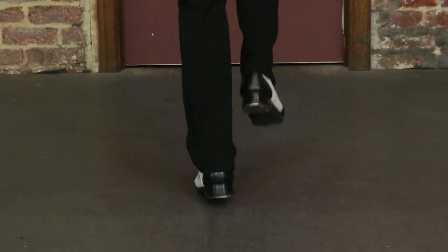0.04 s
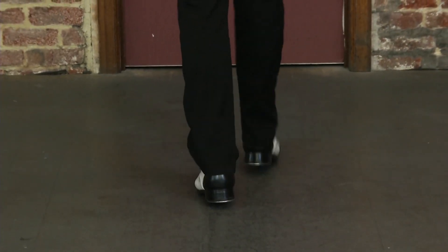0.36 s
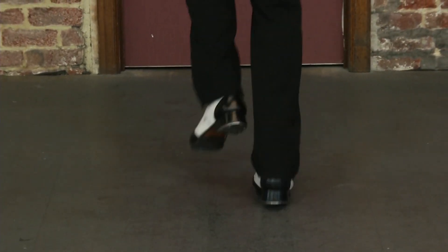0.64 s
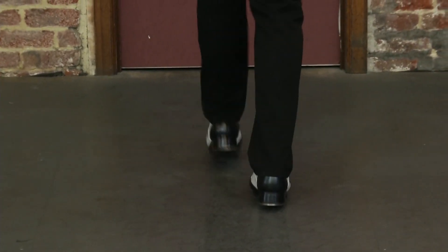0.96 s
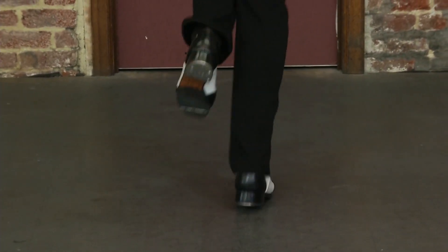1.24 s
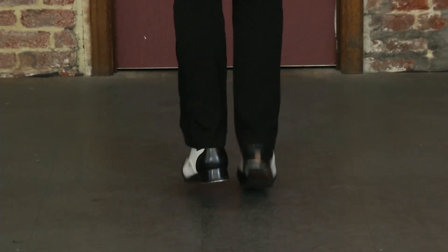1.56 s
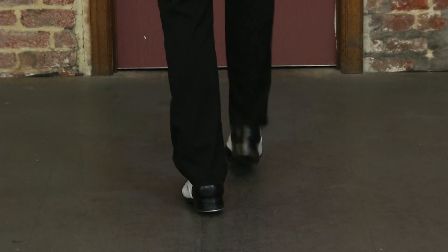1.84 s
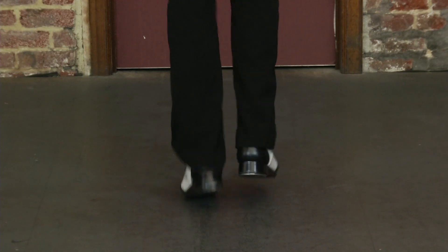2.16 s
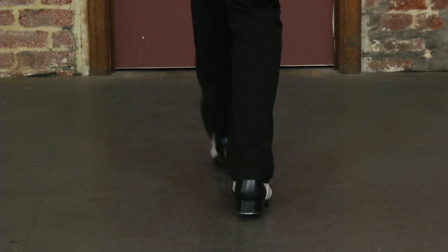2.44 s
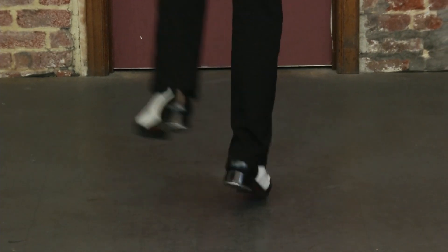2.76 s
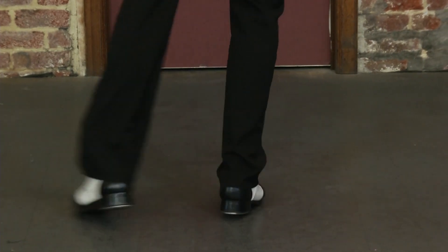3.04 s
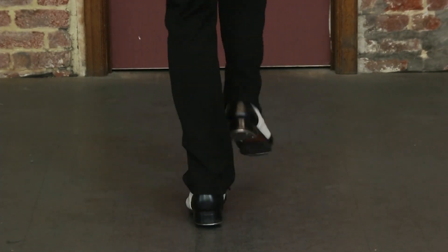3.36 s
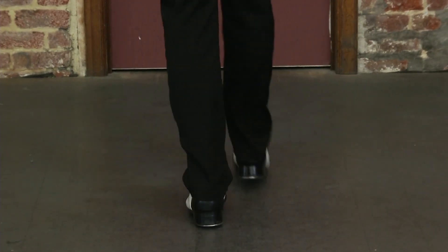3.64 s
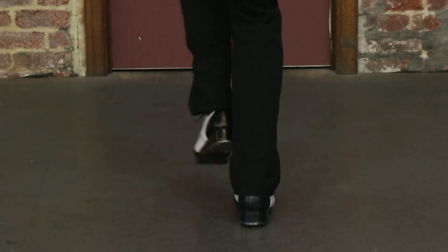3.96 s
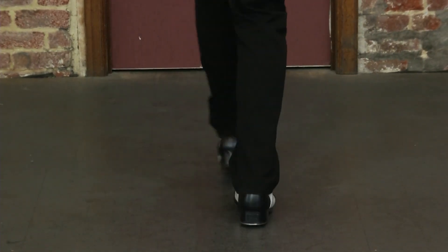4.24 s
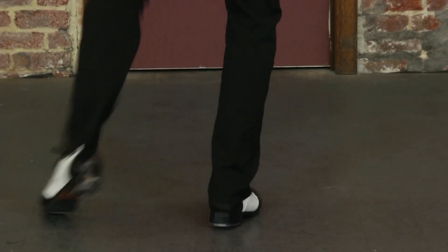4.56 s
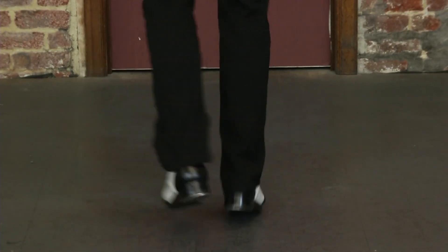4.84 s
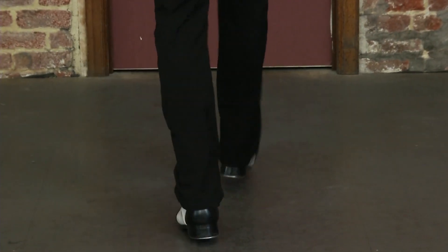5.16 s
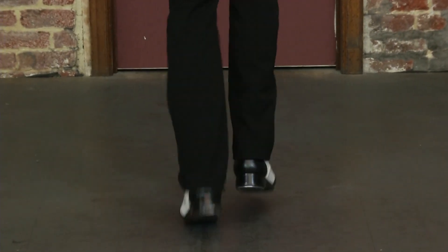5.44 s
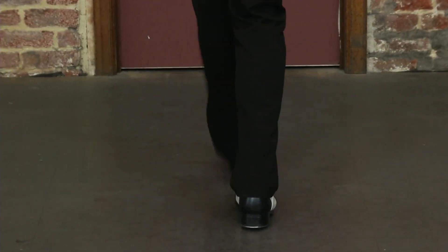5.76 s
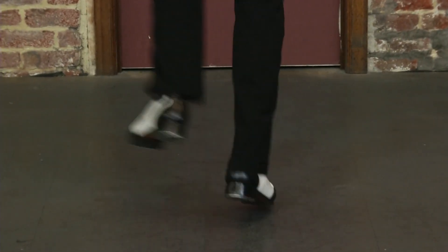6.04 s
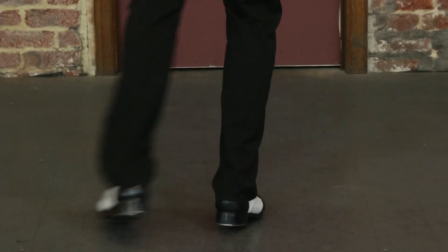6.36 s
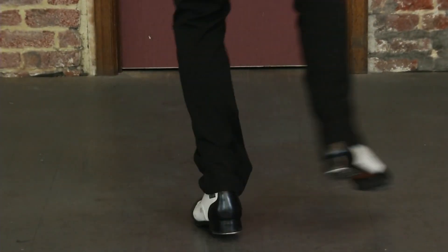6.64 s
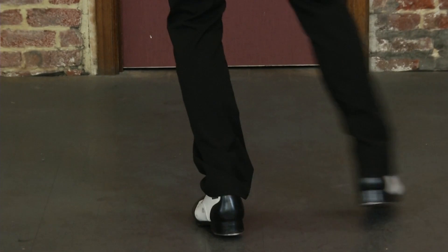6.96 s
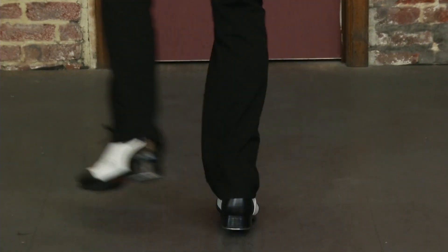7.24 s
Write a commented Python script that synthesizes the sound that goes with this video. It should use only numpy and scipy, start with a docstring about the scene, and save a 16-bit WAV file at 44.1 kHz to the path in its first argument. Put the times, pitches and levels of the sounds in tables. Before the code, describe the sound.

Sharp metallic tap shoe clicks on a hard floor, about five a second, ringing out in a reverberant room.

```python
"""Sharp tap-shoe clicks on a hard floor, about five steps a second, ring out in a brick-walled room.
Each blow shakes the shoe's body, its sole and its metal plate for a few milliseconds.
The room answers with quick echoes and a long fading tail. A faint steady hiss lies underneath.
A limiter turns the volume down on each loud blow, so the tail swells back after it."""
import sys
import numpy as np
from scipy import signal
from scipy.io import wavfile
from scipy.ndimage import uniform_filter1d, minimum_filter1d

SR = 44100
rng = np.random.default_rng(int(sys.argv[2]) if len(sys.argv) > 2 else 0)


def unload_audio(sound):
    """Save the sound as a 16-bit wav file, at the path given as the first command line argument."""
    columns = np.transpose(np.atleast_2d(sound))
    # keep every value between -1 and 1, then stretch to whole-number steps
    steps = np.round(np.clip(columns, -1, 1) * 32767)
    wavfile.write(sys.argv[1], SR, steps.astype(np.int16))


N = 325899
CUTOFF_HZ = 16400   # treble above this is cut away


def from_db(db):
    """Turn decibels into a number to multiply a sound by."""
    return 10 ** (np.asarray(db) / 20)


def at_hz(points, hz, column=1):
    """Look up a table's value at any pitch, sliding between its rows."""
    table = np.array(points)
    return np.interp(np.log(hz), np.log(table[:, 0]), table[:, column])


def noise_bands():
    """Split noise into slices half an octave wide: (middle pitch [Hz], noise) for each."""
    edges = 25 * 2 ** (np.arange(20) / 2)
    white = rng.standard_normal((2, N))
    bands = []
    for k, (low, high) in enumerate(zip(edges, edges[1:])):
        band_filter = signal.butter(2, [low, high], "band", fs=SR, output="sos")
        bands.append((np.sqrt(low * high), signal.sosfilt(band_filter, white[k % 2])))
    return bands


def add(out, sound, start):
    """Mix a sound in from a start sample on."""
    skip = max(0, -start)
    piece = sound[skip:len(out) - start]
    out[start + skip:start + skip + len(piece)] += piece


def strike(ms, tones, tuning, stretch=1, head_start=1.375):
    """A part's tones build as the shoe rolls down, and swing together at 0 ms, when it slaps flat."""
    out = 0
    for hz, decay_ms, level_db in tones:
        detune, change_db, phase = rng.normal(0, [.008, .5, .12])
        age = np.maximum(ms / (decay_ms * stretch) + head_start, 0)   # counted in fade times
        rise_and_fall = age * np.exp(1 - age)
        swing = -np.cos(2 * np.pi * hz * tuning * (1 + detune) * ms / 1000 + phase)
        out = out + from_db(level_db + change_db) * rise_and_fall * swing / stretch
    return out


def skid(ms, level_db=-26, decay_ms=1.0, low_hz=6000):
    """Metal skids on the floor as it lands, making a tiny burst of hiss."""
    keep_treble = signal.butter(2, low_hz, "high", fs=SR, output="sos")
    hiss = signal.sosfilt(keep_treble, rng.standard_normal(len(ms)))
    return from_db(level_db) * hiss * (ms > 0) * np.exp(-np.abs(ms) / decay_ms)


# The tones of the floor, the shoe's parts and the crack where they meet, before a step adjusts them:
# (pitch [Hz], fade time [ms], level [dB])
FLOOR_BOOM = [(376, 2.1, -31.5)]
BODY_THUD = [(280.6, 1.19, -23.5), (539, 0.71, -16.5)]
HEEL_CLOP = [(969, 0.67, -15.5)]
SOLE_KNOCK = [(1424, 0.74, -8), (1855, 0.97, -13.5)]
METAL_RING = [(2211, 0.74, -8), (2730, 0.43, -8.5)]
METAL_CLINK = [(3956, 0.28, -3)]
METAL_PING = [(5450, 0.18, -11.5)]
METAL_TING = [(8130, 0.55, -21.5), (12300, 0.48, -30.5)]
CONTACT_CRACK = [(7230, 0.082, -8), (10700, 0.037, -5)]
# How each kind of stroke turns those sounds up or down and retunes them:
# (boom [dB], thud [dB], clop [dB], knock [dB], ring [dB], clink [dB], ping [dB], crack [dB],
# ring tuning [ratio], clink tuning [ratio])
STROKE_MIX = { "heel": (-25, 3, 9.3, 2.5, -2.7, -2, 2.5, 0.5, 1.08, 1.16),
              "ball": (-9, 3.7, -8, -1, -0.8, -2.5, -12, 1, 1.12, 1.05),
              "stamp": (2, 7.8, -12, 2.2, 1.4, -2.5, 0, 1, 1.06, .95),
              "click": (-23, 2, 6, -4.5, 1, 6.5, 3, 2, 1.06, .99),
              "toe": (-34, 1.6, 6.5, -8, 1.5, 0.1, -0.5, 1.3, 1.0, 1.0),
              "tip": (-35, 3, 0.5, -4.5, 1.6, -0.6, 2.5, 1.5, 1.04, 1.08),
              "dig": (-32, 2.5, -3.5, 1.85, -0.7, .5, -2, 1.3, 1.11, 1.066),
              "slap": (-29, 7.5, -1.5, 1.7, 1.3, 3, -11, 5, 1.16, 1.05),
              "flat": (-15, 4.5, -5, 0.5, 1.3, 2, 4.5, .5, 1.05, 0.9)}


def shoe_tap(ms, stroke, brightness, ting_tuning, pivot_hz=2300, touch_ms=1.87, touch_db=-15):
    """One blow shares its force among the shoe's parts; a sharper landing favours the high ones."""
    boom, thud, clop, knock, ring, clink, ping, crack, ring_tuning, clink_tuning = STROKE_MIX[stroke]
    # the spot that lands picks a high tone of the plate; the higher it is, the weaker it is
    ting = crack - 2.7 * 20 * np.log10(ting_tuning)
    # a stroke with a strong clink leaves the plate free, so the clink rings longer
    clink_stretch = from_db(0.61 * max(clink, 0))
    parts = [(FLOOR_BOOM, boom, 1, 1), (BODY_THUD, thud, 1, 1), (HEEL_CLOP, clop, 1, 1),
             (SOLE_KNOCK, knock, 1, 1), (METAL_RING, ring, ring_tuning, 1),
             (METAL_CLINK, clink, clink_tuning, clink_stretch), (METAL_PING, ping, 1, 1),
             (METAL_TING, ting, ting_tuning, 1), (CONTACT_CRACK, crack, 1, 1)]
    blow = from_db(crack) * skid(ms)
    for tones, level_db, tuning, stretch in parts:
        tilt_db = brightness * np.log2(tones[0][0] / pivot_hz)
        blow += from_db(level_db + tilt_db) * strike(ms, tones, tuning, stretch)
    # the plate's edge touches lightly just before the slap
    early_ms = touch_ms * rng.uniform(0.668, 1.328)
    return blow + from_db(ring + touch_db) * strike(ms + early_ms, METAL_RING, ring_tuning)


# The room's wash of blended echoes:
# (pitch [Hz], relative level [dB], time for the tail to fade 60 dB [s])
ROOM_WASH = [(85, -18, 0.84), (123, -3.5, 1.5), (160, -1, 1.4), (260, 8, 0.49), (580, 0.84, 0.71),
             (900, -9, 1.02), (1410, -6.5, 0.89), (1920, -0.13, 0.91), (2700, -.5, .85), (4200, 0.8, 0.54),
             (7750, -4.5, 0.59), (13300, -9.5, 0.38)]
# Single echoes off the walls and ceiling: (delay [s], level [dB], treble cut-off [Hz])
WALL_ECHOES = [(.0059, -15, 4170), (.0081, -16, 6300), (0.013, -15, 5000), (0.022, -20.5, 3500),
               (0.083, -29, 4500), (.098, -25, 3500)]


def room_answers(count, early_db=-28, early_fade_s=0.12, late_db=-37, gap_s=0.00705):
    """Give the room's answer to each step: the feet move, so the sound bounces differently each time."""
    length = int(1.1 * SR)
    t = np.arange(length) / SR
    arrived = np.clip((t - gap_s) / 0.0005, 0, 1)
    early = from_db(early_db - 60 * t / early_fade_s)
    bands = []
    for hz, noise in noise_bands():
        late = from_db(late_db - 60 * t / at_hz(ROOM_WASH, hz, column=2))
        bands.append((noise, arrived * from_db(at_hz(ROOM_WASH, hz)) * np.hypot(early, late)))
    click = t[:SR // 128] == 0
    dull_clicks = [signal.sosfilt(signal.butter(2, hz, fs=SR, output="sos"), click)
                   for _, _, hz in WALL_ECHOES]
    for _ in range(count):
        start = rng.integers(N - length)
        answer = sum(noise[start:start + length] * fade for noise, fade in bands)
        for (delay_s, level_db, _), echo in zip(WALL_ECHOES, dull_clicks):
            shift_s, change_db = rng.normal(0, [.0005, 2])
            add(answer, from_db(level_db + change_db) * echo, int((delay_s + shift_s) * SR))
        yield answer


# The dance, one row for each blow: (time [s], stroke [name], strength [dB], brightness [dB per octave],
# room share [dB], ting tuning [ratio])
DANCE_STEPS = [ (.0048, "heel", 1.5, -0.4, -2.5, 1.05), (.223, "ball", 0.5, 0, -0.6, 0.89),
               (0.4194, "stamp", 0.5, .4, 2, .73), (0.6213, "click", 2, 0.16, -2, 0.89),
               (.8126, "tip", -1, 0.16, -1.7, 1.02), (1.0262, "dig", 0, 0.4, -2, 1),
               (1.2392, "dig", 0, 0.4, -3.5, 0.98), (1.4504, "toe", 2, 0, -0.5, 0.9),
               (1.6497, "heel", 1, 0, 0.2, 1.16), (1.8685, "ball", -0.3, -0.2, -1.9, .94),
               (2.073, "stamp", -.5, .5, 2, 1.1), (2.2689, "click", -1.5, 0, -2.5, 0.84),
               (2.476, "tip", -.5, 0.1, -1.5, 1.1), (2.6871, "dig", -3, -0.15, -5, 1.25),
               (2.8913, "dig", 3.5, 0.3, -3.5, 0.78), (2.9683, "slap", -0.5, 0.26, -2.5, 0.98),
               (3.094, "flat", -1.5, 0.3, -1, 0.69), (3.3026, "toe", .5, 0.24, -1.5, 1.03),
               (3.509, "ball", -0.2, -.2, -2.5, .95), (3.7047, "stamp", -1, -0.2, 2, 1.02),
               (3.9134, "click", 2.5, -.1, -1.6, 0.97), (4.0876, "tip", 0.8, .3, -2.5, 1.08),
               (4.302, "tip", -1.2, -0.2, -2, 0.71), (4.5154, "dig", 1, .2, -4, 1.2),
               (4.6077, "slap", 2, 0.3, -1, 1), (4.7222, "flat", -0.5, 0, .5, 0.79),
               (4.936, "toe", 0.5, 0, -2.5, 0.98), (5.1346, "ball", 0, 0, -2.5, 0.92),
               (5.346, "stamp", 1.4, .1, 1.2, 1.03), (5.5393, "click", 1, 0.16, -3.5, 0.87),
               (5.7407, "toe", 0.2, .3, -1.5, .99), (5.95, "tip", -1, 0.2, -.9, 0.787),
               (6.1544, "dig", 0, 0.7, -3, 1.02), (6.226, "slap", 1, -.1, -1, 1.03),
               (6.3512, "flat", 1.5, -.5, -1.5, 1.16), (6.568, "toe", 0, 0.4, -1.6, 1),
               (6.7735, "dig", -1, -.6, -5.5, 1), (6.9783, "heel", 0, 0.34, -2, 0.78),
               (7.1846, "toe", -1, .3, -2.5, 0.82), (7.3869, "dig", 3, -0.2, -10, 0.76)]


def tap_dance(boost_db=3):
    """Each blow is heard straight from the shoe, then again as it bounces around the room."""
    before = SR // 200   # samples of build-up ahead of the slap
    ms = np.arange(-before, 3 * before) * 1000 / SR
    out = np.zeros(N)
    for step, answer in zip(DANCE_STEPS, room_answers(len(DANCE_STEPS))):
        time_s, stroke, strength_db, brightness, room_db, ting_tuning = step
        blow = from_db(boost_db + strength_db) * shoe_tap(ms, stroke, brightness, ting_tuning)
        start = round(time_s * SR) - before
        add(out, blow, start)
        add(out, from_db(room_db) * signal.fftconvolve(blow, answer), start)
    return out


# The steady noise under the taps: (pitch [Hz], relative level [dB per Hz])
HISS_AND_RUMBLE = [(25, 24), (60, 19.5), (110, -57), (250, -62), (1000, -64), (4000, 23.5), (15000, -73)]


def steady_hiss(level_db=-46):
    """A faint steady hiss near 4000 Hz over a weaker low rumble."""
    hiss = sum(from_db(at_hz(HISS_AND_RUMBLE, hz)) * noise for hz, noise in noise_bands())
    return from_db(level_db) * hiss / hiss.std()


def limiter(x, threshold_db=-5.0, release_db_per_s=46.0, sense_s=0.0013, ahead_s=0.0003):
    """The volume drops just ahead of each loud burst and creeps back at a steady rate."""
    power = uniform_filter1d(x ** 2, 2 * int(sense_s * SR / 2) + 1)
    excess_db = np.maximum(10 * np.log10(np.abs(power) + 1e-12) - threshold_db, 0)
    width = 2 * int(ahead_s * SR) + 1
    excess_db = -minimum_filter1d(-excess_db, width)   # take the biggest value nearby
    recovery_db = release_db_per_s * np.arange(N) / SR
    cut_db = np.maximum.accumulate(excess_db + recovery_db) - recovery_db
    return x * from_db(-uniform_filter1d(cut_db, width))


def scene():
    """The dancer in the room and the steady hiss, in one channel."""
    return (tap_dance() + steady_hiss())[None]


def record(dry, upper=1.0, lower=0.76):
    """Limit the volume, round off the wave's tops and bottoms unevenly, then cut the highest treble."""
    limited = limiter(dry[0])
    ceiling = np.where(limited > 0, upper, lower)
    rounded = limited / (1 + (limited / ceiling) ** 4) ** (1 / 4)
    treble_cut = signal.ellip(10, .1, 80, CUTOFF_HZ, fs=SR, output="sos")
    return signal.sosfilt(treble_cut, rounded)[None]


dry = scene()
out = record(dry)
unload_audio(out)
```